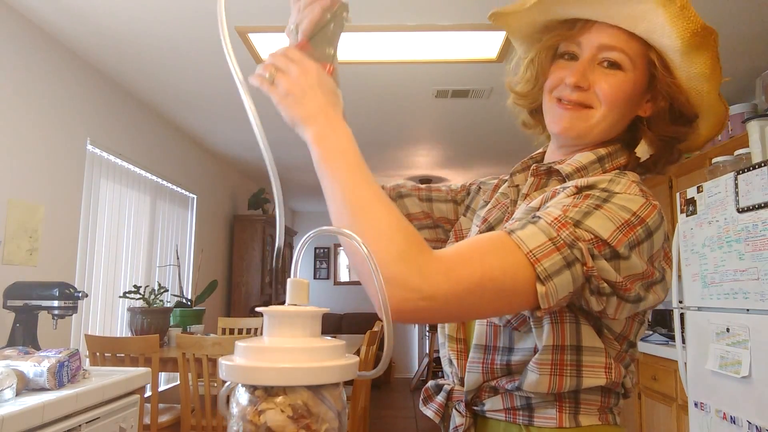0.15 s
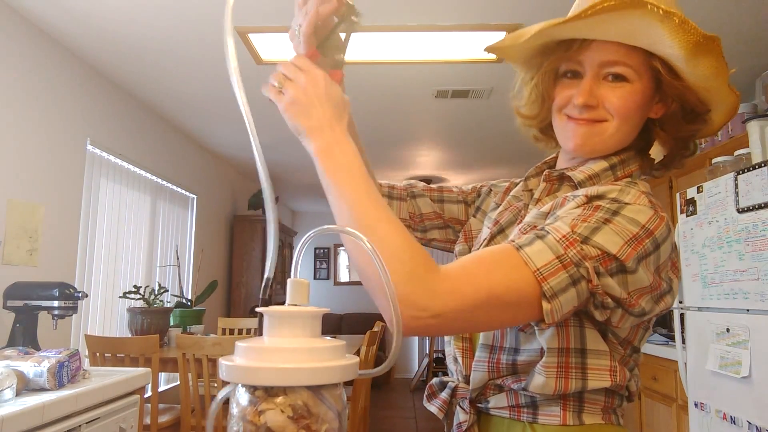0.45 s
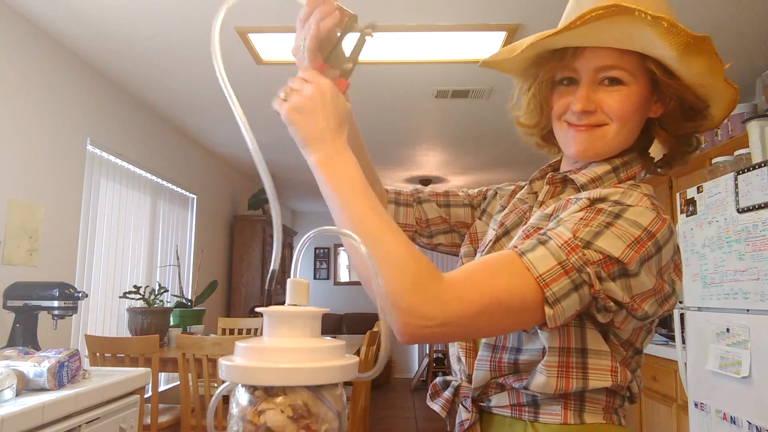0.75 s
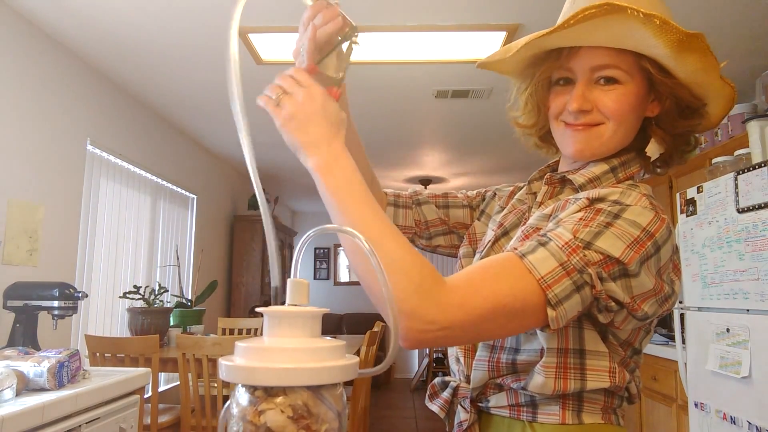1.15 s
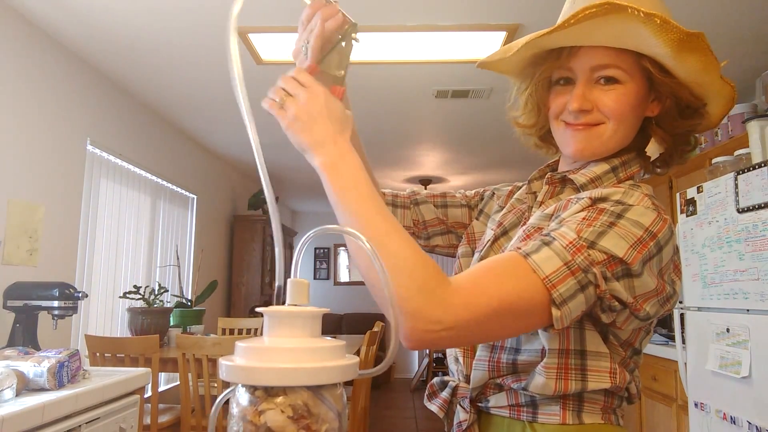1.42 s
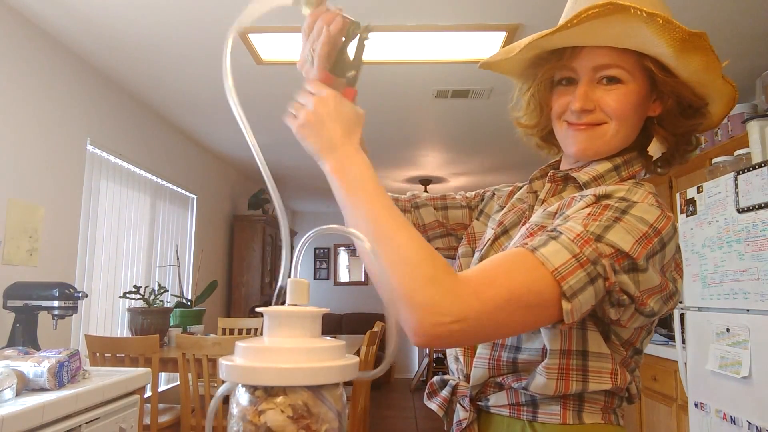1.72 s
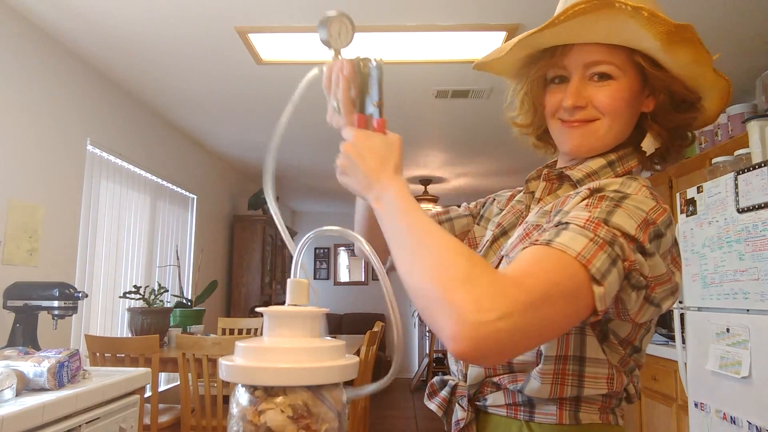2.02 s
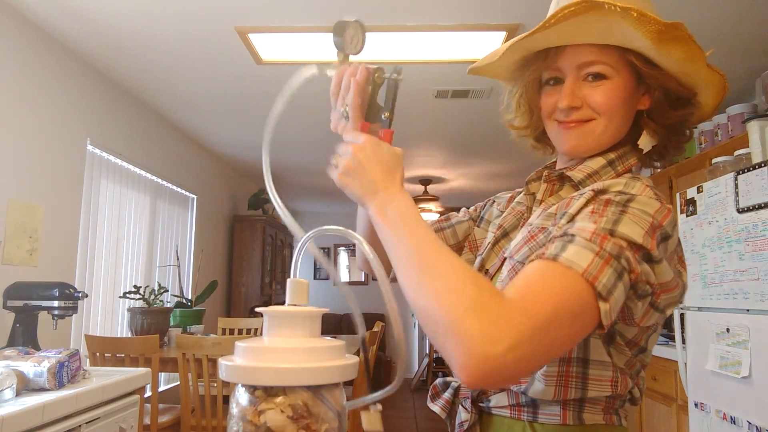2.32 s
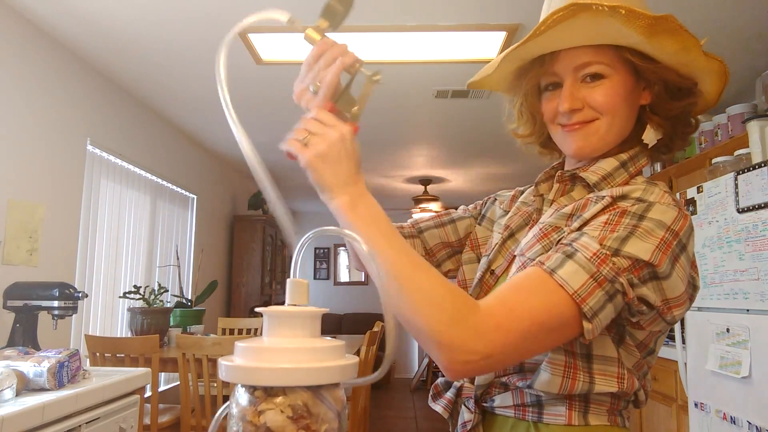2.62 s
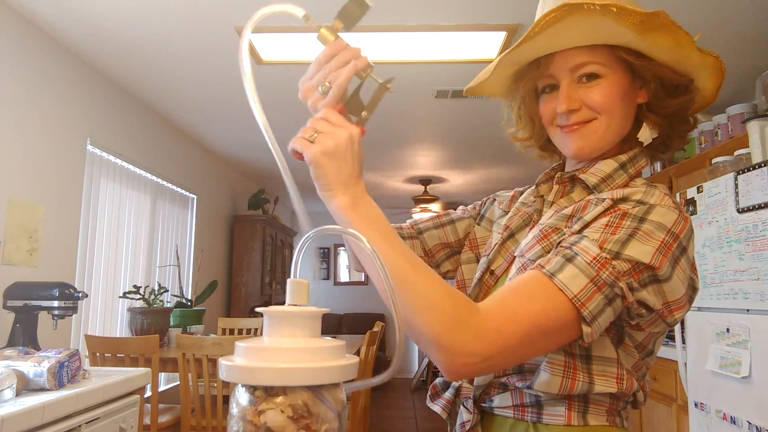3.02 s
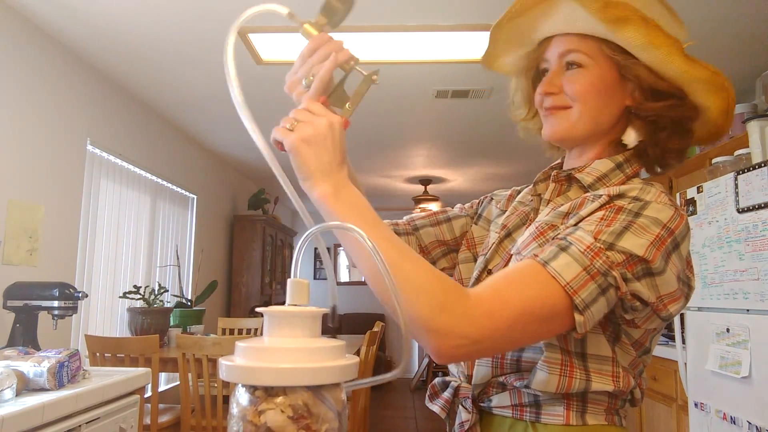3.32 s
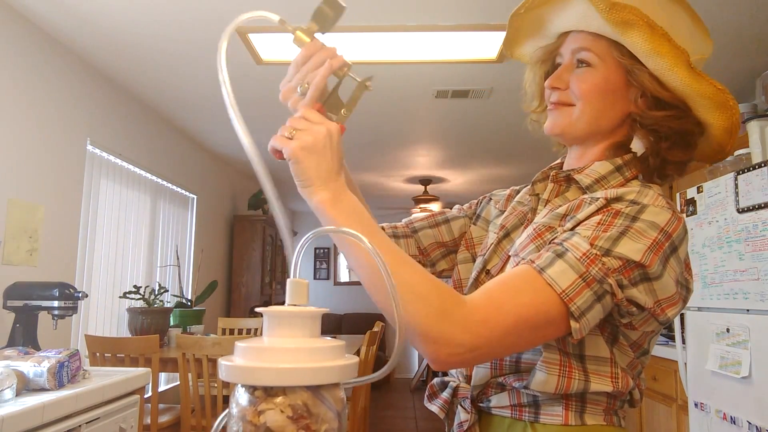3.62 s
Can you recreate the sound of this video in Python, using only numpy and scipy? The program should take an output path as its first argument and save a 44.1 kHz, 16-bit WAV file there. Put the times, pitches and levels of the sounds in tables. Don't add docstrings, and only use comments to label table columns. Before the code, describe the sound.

Fast, regular pump strokes thud, snap and wheeze close by in a kitchen while a bird trills.

```python
import sys
import numpy as np
from scipy import signal
from scipy.fft import rfft, irfft, next_fast_len
from scipy.io import wavfile
from scipy.ndimage import uniform_filter1d

SR = 44100
rng = np.random.default_rng(int(sys.argv[2]) if len(sys.argv) > 2 else 0)


def dump_mix(stems):
    frames = np.atleast_2d(stems).T
    limited = np.clip(frames, -1, 1)
    pcm = np.round(limited * 32767).astype(np.int16)
    wavfile.write(sys.argv[1], SR, pcm)


def to_linear_factor(level_db):
    exponent = np.asarray(level_db, float) / 20
    return 10 ** exponent


N = 165375


def read(points, hz):
    f, value = np.transpose(points)
    return np.interp(np.log(hz + 1), np.log(f + 1), value)


def evened(x):
    return x / np.sqrt(np.mean(x ** 2) + 1e-20)


def add(mix, s, sound):
    part = mix[round(max(s, 0) * SR):][:len(sound)]
    part += sound[:len(part)]


def resonate(x, hz, width_hz):
    r = np.exp(-np.pi * width_hz / SR)
    poles = [1, -2 * r * np.cos(2 * np.pi * hz / SR), r * r]
    return signal.lfilter([(1 - r * r) / 2, 0, (r * r - 1) / 2], poles, x)


def noise(points, patchy_db):
    hz = np.fft.rfftfreq(256, 1 / SR)[:, None]
    real, imag, patch = rng.standard_normal((N // 64 + 5, 129, 3)).T
    patch = uniform_filter1d(patch, size=5, axis=0)
    patch = evened(uniform_filter1d(patch, size=8, axis=1))
    z = (real + 1j * imag) * to_linear_factor(read(points, hz) + patchy_db * patch) * (hz > 400)
    return evened(signal.istft(z, nperseg=256, noverlap=192)[1][:N])


def room_tone():
    # hz, level_db
    air_tone = [(40, -2), (120, -3), (400, -4), (830, 1), (1300, -14), (2000, -9), (5000, -10),
                (15000, -30)]
    white, source = rng.standard_normal((2, N))
    air = irfft(rfft(white) * to_linear_factor(read(air_tone, np.fft.rfftfreq(N, 1 / SR))), N)
    hum = resonate(source, 112.6, 6.9)
    vent = resonate(source, 826.5, 38.0)
    return to_linear_factor(-53) * evened(air) + to_linear_factor(-65.5) * evened(hum) + to_linear_factor(-56) * evened(vent)


def handle():
    # start_s, level_db, ring_db, t60_s
    snaps = [(0.5695, -4.5, -10.5, 0.087), (0.814, -6, -6.5, 0.077), (1.084, -7, -5, 0.043),
             (1.3156, -1, -10, 0.05), (1.571, -14, -2, 0.075), (1.868, -35, 12, 0.14),
             (2.108, -18.5, -6.5, 0.044), (2.314, -39, -26, 0.028), (2.389, -15.5, -21, 0.027),
             (2.408, -22.5, -0.5, 0.078), (3.047, -16.5, -2, 0.023), (3.3415, -25.5, 9.5, 0.034)]
    # start_s, level_db, ring_db, length_s
    rubs = [(-0.008, -45, 10, 0.023), (0.11, -53, -9, 0.027), (0.159, -36.5, 5.5, 0.047),
            (0.205, -48.5, 13.5, 0.033), (0.223, -26, 5.5, 0.017), (0.263, -58, 18, 0.03),
            (0.386, -39, 2, 0.17), (0.435, -24.5, -7.5, 0.02), (0.511, -39, -4, 0.12),
            (0.637, -38.5, -7, 0.17), (0.678, -27.5, 5, 0.025), (0.7726, -24, -5, 0.055),
            (0.883, -36, -32, 0.097), (0.9346, -29.5, 2, 0.032), (1.01, -39, -3, 0.11),
            (1.146, -42, -11, 0.03), (1.177, -31, -1.5, 0.051), (1.386, -42, 1, 0.019),
            (1.421, -36, -14, 0.05), (1.635, -51, 12.5, 0.044), (1.681, -44, 13, 0.033),
            (1.824, -43.5, 1.7, 0.2), (1.933, -26, 0.82, 0.024), (2.1296, -35.5, 1.2, 0.079),
                 (2.178, -26, 1.7, 0.021), (2.2614, -28, 1.1, 0.016), (2.451, -27, 0.66, 0.046),
                 (2.5346, -28.5, 2.2, 0.039), (2.6489, -41, 2.8, 0.067), (2.7094, -32.5, 5, 0.037),
                 (2.8997, -37.5, 2.8, 0.074), (2.953, -26, 0.68, 0.036), (3.1534, -41, 4.4, 0.08),
                 (3.219, -34, 2.5, 0.037), (3.462, -29.5, 1.3, 0.027), (3.541, -36, 1.4, 0.064),
                 (3.6621, -41, 3, 0.17), (3.72, -33.5, 1.3, 0.028)]
    # start_s, level_db
    tick_events = [
        (1.3192, -9),
        (2.3155, -12),
        (2.5026, -21),
        (1.853, -28),
        (1.869, -25),
        (2.409, -24),
    ]
    # hz, width_hz, level_db
    metal_modes = [(1689, 19, -4), (1900, 87, 4), (2079, 78, 1), (2194, 35, -8.5), (2775, 60, -15.5),
                   (3986, 50, -6), (4727, 59, -5.5), (6044, 22, -14.5), (7880, 340, -10.5),
                   (12000, 58, -21)]
    # hz, level_db
    hiss_tone = [(300, -22.5), (900, 7.5), (1500, -36), (4000, 2.5), (8000, -8), (11000, -12), (13500, -24),
                 (15300, -10)]
    snap_rise_s, spring_db, spring_t60_s = 0.0069, -19.5, 0.94
    t = np.arange(8000) / SR
    grit, shake, ticks = np.zeros((3, N))
    for s, db, ring_db, t60_s in snaps:
        shape = np.minimum(t / snap_rise_s, 1) ** 2 * to_linear_factor(-60 * t / max(t60_s, .005))
        spring = to_linear_factor(spring_db - 60 * t / spring_t60_s)
        add(grit, s - snap_rise_s / 2, to_linear_factor(db) * shape)
        add(shake, s - snap_rise_s / 2, to_linear_factor(db + ring_db) * (shape + spring))
    for s, db, ring_db, length_s in rubs:
        rise = np.sin(np.pi / 2 * np.minimum(t / 0.013, 1)) ** 2
        shape = rise * np.exp(-(t / max(length_s, .005)) ** 2)
        add(grit, s - .005, to_linear_factor(db) * shape)
        add(shake, s - .005, to_linear_factor(db + ring_db) * shape)
    for s, db in tick_events:
        add(ticks, s, to_linear_factor([db + 4]))
    grain_db, shift_db = 3, 6
    grain = to_linear_factor(grain_db * evened(uniform_filter1d(rng.standard_normal(N), size=300)))
    drive = shake * grain * rng.standard_normal(N) + 3.0 * ticks
    shift = to_linear_factor(shift_db * evened(uniform_filter1d(rng.standard_normal((len(metal_modes), N)), size=2500)))
    ring = np.zeros(N)
    for (hz, width_hz, db), gain in zip(metal_modes, shift):
        ring += to_linear_factor(db) * resonate(drive * gain, hz, width_hz) / np.sqrt(width_hz / SR)
    grip = to_linear_factor(-5.5) * resonate(grit * rng.standard_normal(N), 1003, 53.0)
    hiss = to_linear_factor(-13) * grit * grain * noise(hiss_tone, patchy_db=0.0)
    return hiss + to_linear_factor(-25) * ring + grip + resonate(ticks, 3600, 3500)


def squeaks():
    # start_s, pitch_hz, level_db
    chirps = [
        (0.01, 1052, -46),
        (0.175, 977, -44.5),
        (0.635, 995, -40),
        (0.899, 1007, -44),
        (1.396, 983, -45),
        (1.636, 1001, -47),
        (1.785, 930, -41),
        (3.534, 1048, -37.5),
    ]
    # start_s, length_s, pitch_hz, level_db
    spring_squeaks = [(0.155, 0.014, 2040, -39), (0.193, 0.016, 2130, -34), (0.277, 0.022, 2050, -37),
                      (0.376, 0.013, 2100, -41), (0.418, 0.036, 2157, -35.5), (0.43, 0.029, 2775, -43),
                      (0.518, .014, 2190, -34), (0.57, 0.024, 2775, -38), (0.684, 0.027, 2090, -45),
                      (0.932, 0.025, 2080, -48), (1.129, .02, 2400, -39.5), (1.141, 0.019, 2190, -39),
                      (1.175, 0.023, 2200, -35), (1.18, 0.092, 2427, -45.5), (1.375, .04, 2650, -48),
                      (1.408, 0.032, 2250, -39), (1.484, 0.078, 2490, -71), (1.633, 0.068, 2220, -44),
                      (1.64, 0.033, 2370, -42), (1.688, 0.036, 2510, -50), (1.861, 0.068, 2220, -40.5),
                      (1.895, .04, 2050, -34), (2.007, 0.046, 2775, -45.5), (2.031, 0.0083, 6170, -40),
                      (2.115, 0.077, 2060, -38), (2.408, .014, 3050, -39), (2.41, 0.042, 2110, -37),
                      (2.547, 0.011, 3060, -31), (2.552, 0.053, 2775, -48), (2.555, 0.024, 2247, -33.5),
                      (2.583, 0.056, 2290, -38), (2.801, 0.02, 2185, -36.5), (2.846, 0.021, 2220, -38),
                      (2.922, 0.038, 2054, -35.5), (3.602, 0.067, 2280, -48.5)]
    chirp_s, chirp_rise_hz, waver_hz, rasp_depth = 0.0343, 181, 42, 0.16
    out = np.zeros(N)
    rows = [(s, chirp_s, hz, db, chirp_rise_hz) for s, hz, db in chirps]
    rows += [(*row, 0) for row in spring_squeaks]
    for (s, length_s, hz, db, rise_hz), v in zip(rows, rng.standard_normal((len(rows), 2, 5000))):
        u = np.arange(0, 1, 1 / (SR * np.clip(length_s, .005, .1)))
        slow = uniform_filter1d(uniform_filter1d(v, size=200), size=200)
        waver, rasp = evened(slow)[:, :len(u)]
        pitch_hz = hz + rise_hz * (u - .5) + waver_hz * waver
        tone = np.sin(2 * np.pi * np.cumsum(pitch_hz) / SR)
        add(out, s, to_linear_factor(db) * (1 + rasp_depth * rasp) * np.sin(np.pi * u ** 0.74) * tone)
    return out


def piston():
    # start_s, level_db, upper_modes_db, puff_db
    thumps = [(0.293, -13.5, 4, -22.5), (0.528, -12, 5, -24.5), (0.777, -11.5, 5.5, -31),
              (1.041, -13.5, 3.5, -24.5), (1.279, -10.5, 3, -25), (1.528, -15, 1.5, -23.5),
              (1.757, -13, -3, -24), (2.009, -11.5, -5.5, -24.5), (2.272, -12, -7, -25),
              (2.552, -12.5, -4, -25.5), (2.811, -12.5, -7, -25), (3.068, -9.5, -2.5, -27),
              (3.303, -10, -8.5, -28), (3.571, -11.5, -0.5, -24.5)]
    # hz, level_db, t60_s
    barrel = [(116, -2, 0.092), (194.7, 10.5, 0.028), (286, 16.5, 0.013), (417, 11, 0.034),
              (615, 13, 0.028), (724, 16.5, 0.013), (851, 16, 0.009), (1054, 8.5, 0.068),
              (1280, -14, 0.013), (1438, 4.5, 0.02)]
    # hz, level_db
    puff_tone = [(600, 12.5), (2000, 0), (4000, -4), (6000, -4), (8200, -2), (11000, -14), (13500, -13),
                 (15300, -13)]
    upper_hz, mode_spread, swell_s = 850, .015, 0.0015
    rebound_s, rebound_db = 0.004168, -4
    gripped_s, left_ringing = 0.023, 0.18
    lead_in_s, lead_in_db = 0.0048, -5
    puff_rise_s, puff_hold_s, puff_t60_s, burst_t60_s = 0.00073, 0.022, 0.17, 0.058
    t = np.arange(8000) / SR
    body, puff = np.zeros((2, N))
    hz, mode_db, t60_s = np.transpose(barrel)[:, :, None]
    sign = np.resize([-1, 1], hz.shape[0])[:, None]
    swell = (1 - np.exp(-t / swell_s)) * (left_ringing + np.exp(-(t / gripped_s) ** 2))
    lead_in = np.sqrt(t[t < lead_in_s] / lead_in_s)
    burst = to_linear_factor(-60 * np.maximum(t - puff_hold_s, 0) / puff_t60_s) + 1.7 * to_linear_factor(-60 * t / burst_t60_s)
    burst = np.minimum(t / puff_rise_s, 1) * burst
    spread = rng.standard_normal((len(thumps), len(barrel), 1))
    for (s, db, upper_db, puff_db), v in zip(thumps, spread):
        decay = to_linear_factor(mode_db + upper_db * (hz > upper_hz) - 60 * t / t60_s)
        modes = sign * decay * np.sin(2 * np.pi * hz * (1 + mode_spread * v) * t) * swell
        add(body, s, to_linear_factor(db - 20) * modes.sum(0))
        add(body, s + rebound_s, to_linear_factor(db - 22 + rebound_db) * modes[3:].sum(0))
        add(puff, s - lead_in_s, to_linear_factor(db + puff_db + lead_in_db) * lead_in)
        add(puff, s, to_linear_factor(db + puff_db) * burst)
    return body + puff * noise(puff_tone, patchy_db=6.0)


def bird():
    # middle_s, top_hz, level_db
    trill = [(2.655, 2487, -40.5), (2.71, 2680, -38), (2.755, 2703, -42), (2.869, 2740, -42),
             (2.923, 2725, -41), (2.965, 2715, -38), (3.006, 2780, -37.5), (3.051, 2900, -37.5),
             (3.094, 3050, -36.5), (3.142, 2737, -40.5), (3.192, 2610, -37.5), (3.239, 2727, -34),
             (3.289, 2850, -38.5), (3.335, 2744, -37), (3.387, 2643, -43.5), (3.431, 2815, -41)]
    # start_s, length_s, pitch_hz, level_db
    peeps = [
        (3.579, 0.086, 2793, -45),
    ]
    sweep_hz, note_s, rasp_depth = 460, 0.031, .65
    out = np.zeros(N)
    arch = np.sin(np.pi * np.arange(round(note_s * SR)) / (note_s * SR))
    for (s, top_hz, db), v in zip(trill, rng.standard_normal((len(trill), 3000))):
        rasp = 1 + rasp_depth * evened(uniform_filter1d(v, size=70))[:len(arch)]
        pitch_hz = top_hz + sweep_hz * (arch - 1)
        add(out, s - note_s / 2, to_linear_factor(db) * rasp * arch * np.sin(2 * np.pi * np.cumsum(pitch_hz) / SR))
    for s, length_s, pitch_hz, db in peeps:
        t = np.arange(0, length_s, 1 / SR)
        add(out, s, to_linear_factor(db) * np.sin(np.pi * (t / length_s) ** .5) * np.sin(2 * np.pi * pitch_hz * t))
    return out


def kitchen(x):
    # hz, t60_s
    decay = [(200, 0.27), (2000, 0.56), (12000, 0.29)]
    taps = np.zeros((2, SR // 2))
    slots = np.arange(160, SR // 2 - 20, 20)
    at = slots + rng.integers(0, 20, (2, len(slots)))
    np.put_along_axis(taps, at, rng.choice([-1., 1.], at.shape), 1)
    hz, t, z = signal.stft(taps, SR, nperseg=256)
    tail = signal.istft(z * to_linear_factor(-60 * t / read(decay, hz)[:, None]), SR, nperseg=256)[1]
    return signal.fftconvolve(x[None], tail / np.linalg.norm(tail[0]), axes=1)[:, :N]


def scene():
    pump = piston() + handle() + squeaks()
    song, tone = bird(), room_tone()
    same, apart = kitchen(to_linear_factor(-10.5) * pump + to_linear_factor(-10) * song + to_linear_factor(-19.0) * tone)
    return pump + song + tone + same + to_linear_factor(-13) * apart * np.array([[1], [-1]])


def ports(dry, size):
    # hz, lead_rad
    low_lead = [(100, -2), (450, 1.01), (1150, 0.12)]
    # hz, balance_db
    low_balance = [(40, -1), (70, -7), (130, -4.5), (250, -.4)]
    # hz, width_hz, depth_db
    mic_dips = [(10900, 260, -12), (12900, 390, -0.5), (9620, 110, -4)]
    wide_s, wide_hz = .00056, 1150
    hz = np.fft.rfftfreq(size, 1 / SR)
    lead_rad = np.where(hz > wide_hz, 2 * np.pi * hz * wide_s - np.pi, read(low_lead, hz))
    edge = 1 / (1 + (hz / 15400) ** 110) / np.sqrt(1 + (100 / (hz + 1)) ** 6)
    for dip_hz, width_hz, db in mic_dips:
        edge = edge * to_linear_factor(db * np.exp(-((hz - dip_hz) / width_hz) ** 2))
    side = np.array([[-.5], [.5]])
    turn = np.exp(1j * side * lead_rad) * to_linear_factor(-side * read(low_balance, hz)) * edge
    flutter = rfft(rng.standard_normal(dry.shape), size) * 30 / (1 + (hz / 45) ** 4)
    return rfft(dry, size) * turn + to_linear_factor(-84) * flutter


def unmasked(pair):
    mask_db, bass_hz = -32.5, 1.35 * 1150
    hz, _, z = signal.stft(pair, SR, nperseg=1024)
    power = abs(z) ** 2
    near_db = 10 * np.log10(abs(uniform_filter1d(power, size=5, axis=-2)) + 1e-20)
    around_db = 10 * np.log10(abs(uniform_filter1d(power.sum(0), size=40, axis=-2)) + 1e-20)
    kept = (near_db > .7 * around_db + mask_db) | (hz[:, None] < bass_hz)
    return signal.istft(z * kept, nperseg=1024)[1]


def top_cut(x):
    return signal.sosfilt(signal.butter(12, 16800, fs=SR, output="sos"), x)


def record(dry):
    size = next_fast_len(N + 200)
    left, right = ports(dry, size)
    mid, diff = unmasked(irfft(np.array([left + right, left - right]) / 2, size))
    return top_cut(np.array([mid + diff, mid - diff])[:, :N])


dry = scene()
out = record(dry)
dump_mix(out)
```